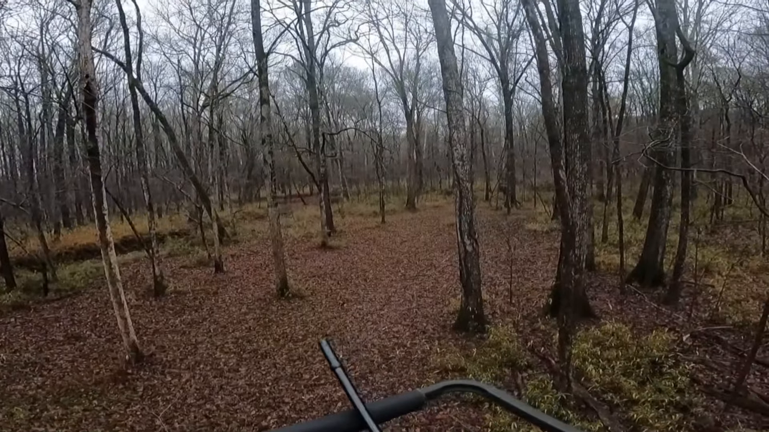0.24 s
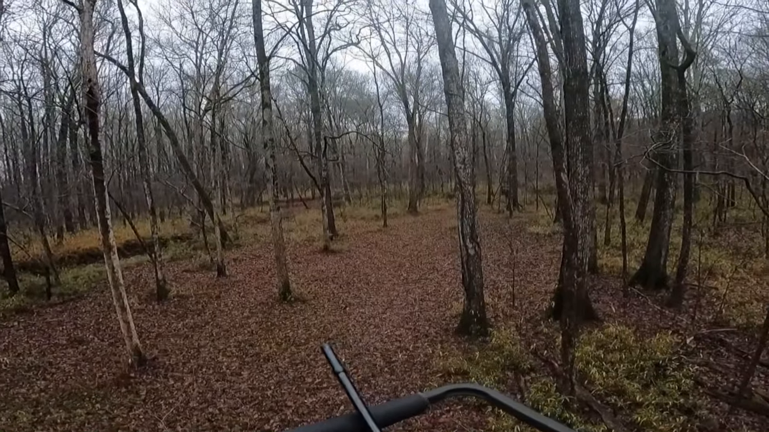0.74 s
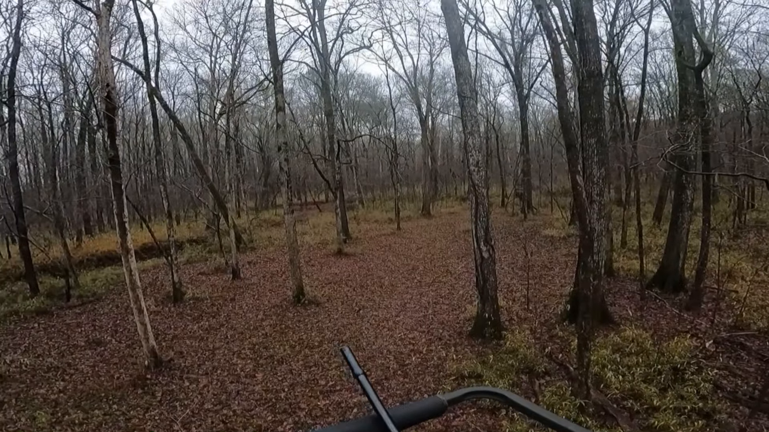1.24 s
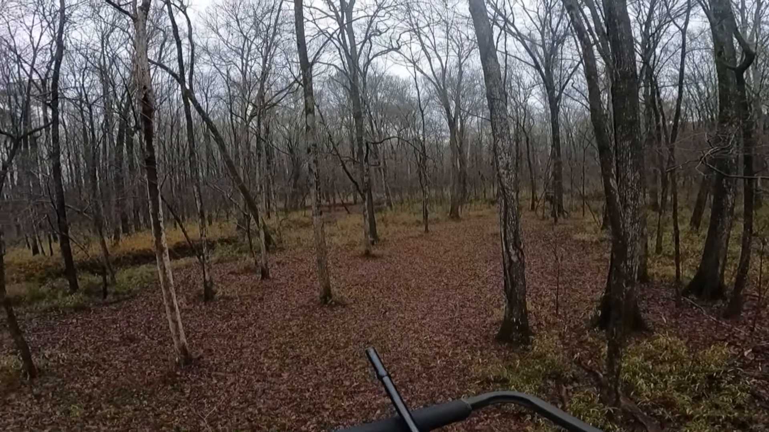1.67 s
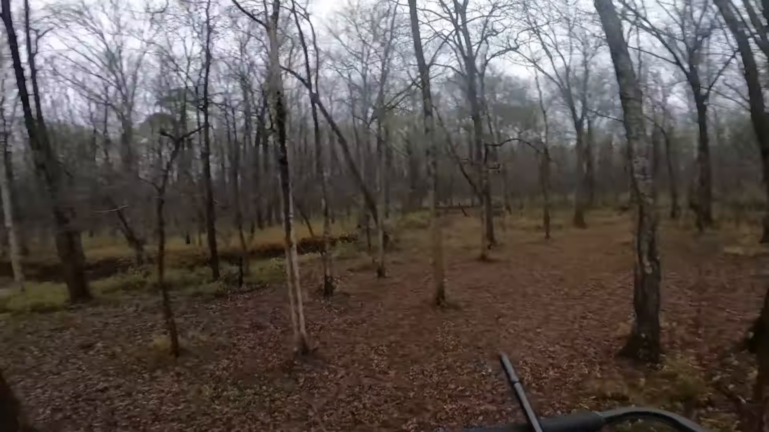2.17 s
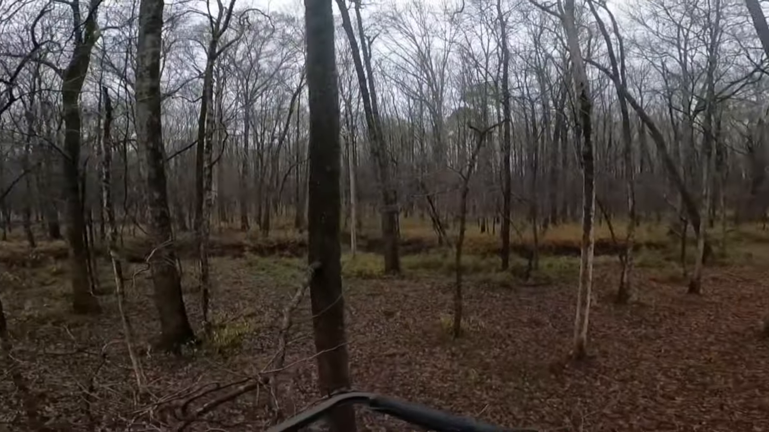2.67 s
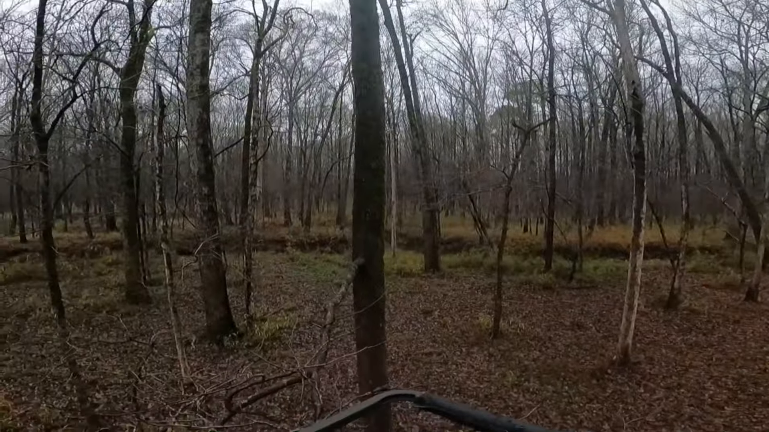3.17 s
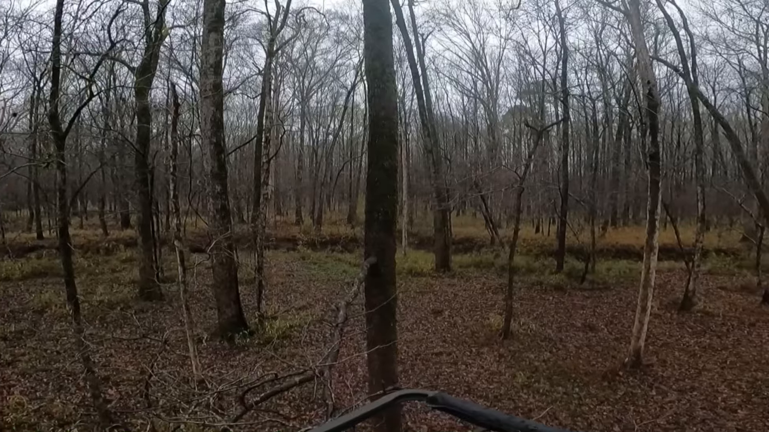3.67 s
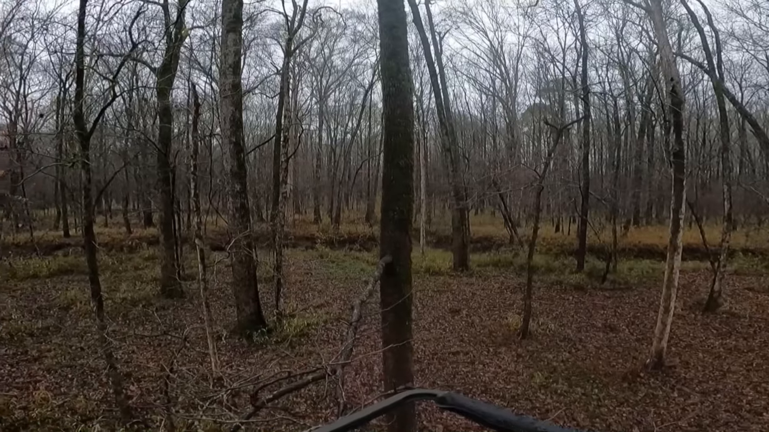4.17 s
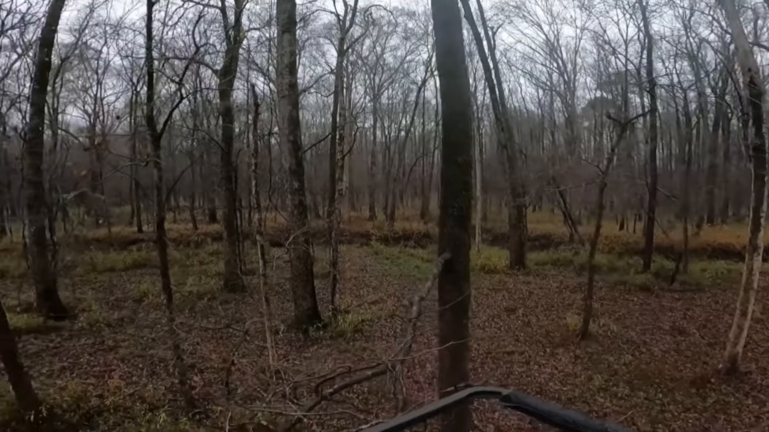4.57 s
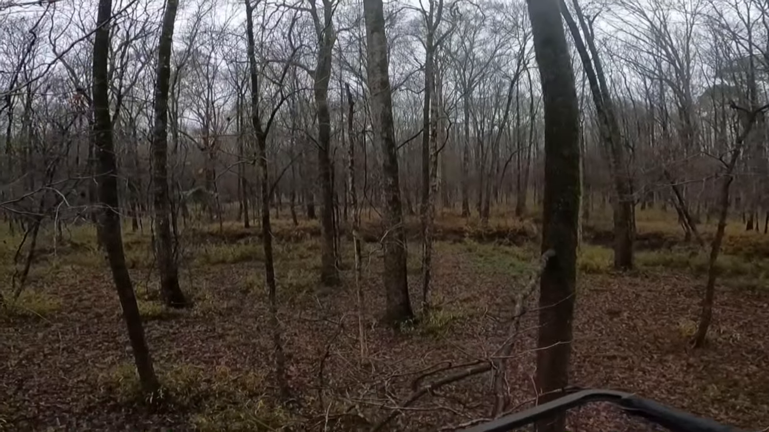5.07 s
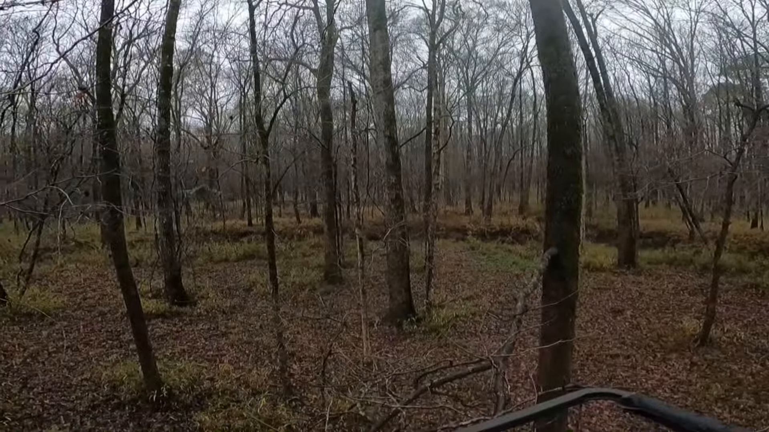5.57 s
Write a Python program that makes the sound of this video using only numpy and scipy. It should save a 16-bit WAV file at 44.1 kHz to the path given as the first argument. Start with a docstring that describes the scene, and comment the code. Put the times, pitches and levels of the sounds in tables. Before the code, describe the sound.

Close antler rattling in a bare winter wood, captured by a small camera microphone. It begins at once with a dense, uneven clatter of dry, bony clacks and gritty scraping until about 0.5 s, the loudest blows slightly overloaded. A diffuse echo from the trunks fades through a pause. A quick cluster hits at 1.85 s, then light ticks and a short clash around 2.2 s, a busier rattle from 2.4 to 2.6 s, and a compact burst at 2.9 s. During the next pause, faint high bird chirps rise between 3.2 and 3.95 s, with soft low wind swelling near 3.4 s. More short clacks and rubs come at 4.1, 4.4, 5.0 and 5.35 to 5.57 s. The echo stops abruptly near 5.6 s, leaving slightly brighter hiss, a very faint hoarse tone and two barely audible ticks. The antlers sit slightly left.

```python
"""Antlers clashing in a winter wood

A pair of antlers is knocked and ground together close to an action camera in a bare winter wood.
Each knock is a rough contact that rings the hand-damped tines for a few ms; loud peaks overload the microphone.
Grinding is made of dense noise ticks, and the trunks answer with a long echo of fading noise.
Behind lie a quiet filtered-noise hiss, low gusts of wind, faint rising bird chirps and a hoarse tone."""
import sys
import numpy as np
from scipy import signal
from scipy.io import wavfile
from scipy.ndimage import uniform_filter1d

SR = 44100
rng = np.random.default_rng(int(sys.argv[2]) if len(sys.argv) > 2 else 0)


def persist_wave(psi):
    """Save psi, clipped to +-1, as 16-bit WAV."""
    counts = np.round(np.clip(psi, -1, 1) * 32767).astype(np.int16)
    wavfile.write(sys.argv[1], SR, np.atleast_2d(counts).T)


N = 257103
TIME = np.arange(N) / SR  # seconds

# hiss of the wood: [f/Hz, relative level per Hz/dB]
WOOD_SPECTRUM = [(300, 2.5), (600, -4.5), (850, -5.5), (1100, -5.5), (1600, -6), (2350, -4.5), (3000, -5),
                 (3900, -6.5), (4500, -16.5), (5200, -22.5), (6300, -24), (7600, -15.5), (8300, -16),
                 (10000, -39.5), (12500, -60.5)]
# colour of the wind: [f/Hz, relative level/dB]
WIND_BANDS = [(26, -1.5), (60, -3), (110, -12), (170, 2), (260, -9.5)]
# strength of the wind over time: [t/s, level of deep buffeting/dB, level of rumble/dB]
GUST_LEVELS = [(0.0, -63, -54.5), (0.4, -66, -56), (0.6, -71.5, -70), (1.1, -72, -63), (1.6, -62, -56.5),
               (2.1, -68, -61), (2.8, -64, -61.5), (3.4, -52, -58.5), (3.9, -60, -57.5), (4.6, -67.5, -64),
               (5.2, -66, -65), (5.83, -69, -58.5)]
# rising chirps of a distant bird: [t/s, length/s, level/dB]
BIRD_CHIRPS = [(1.501, 0.031, -71.5), (3.239, 0.038, -53.5), (3.47, 0.013, -50), (3.521, 0.016, -56),
               (3.582, 0.032, -51.5), (3.852, 0.022, -56.5), (3.912, 0.04, -53.5)]
# echo of the trunks: [f/Hz, time to fall 60 dB/s, relative level/dB]
TRUNK_BANDS = [(663, 0.12, -37.5), (1320, 0.38, -35), (2880, 0.96, -40.5), (4370, 1.9, -45),
               (6500, 1.3, -40), (9300, 0.3, -28), (11000, .45, -39.5)]
# what the antlers ring with: [f/Hz, relative level/dB, time to fall 60 dB/ms]
ANTLER_MODES = [(1028, -17, 17), (1562, -17.5, 10), (1777, -9, 20), (2225, -6, 22), (2610, -6.5, 37),
                (2790, -3, 25), (3007, 11, 12), (3460, 6.5, 16), (3693, 2.5, 17), (4147, 4.5, 14),
                (4580, 0, 7.2), (4875, 0.5, 16), (5467, -4.5, 24), (6306, -5.5, 9.5), (6090, -11.5, 29),
                (7227, -10.5, 14), (7630, -21, 6), (8950, -18.5, 8.9), (10600, -14.5, 2.2)]
# tines grinding along each other: [start t/s, stop t/s, level/dB]
GRIND_SPELLS = [(0., 0.011, -31), (0.04, 0.108, -38.5), (0.133, 0.169, -19.5), (0.164, 0.216, -37),
                (0.276, 0.297, -23), (0.286, 0.323, -35), (0.354, 0.429, -33), (1.837, 1.863, -26.5),
                (2.184, 2.24, -38), (2.233, 2.284, -35), (2.452, 2.496, -23), (2.54, 2.6, -39.5),
                (2.901, 2.963, -35), (4.055, 4.099, -36), (4.428, 4.454, -27), (4.965, 5.053, -34),
                (5.045, 5.075, -33.5), (5.345, 5.376, -24.5), (5.47, 5.49, -41), (5.476, 5.53, -32.5)]
# knocks: [t/s, peak level before filtering/dB, loudest ring f/Hz, brightness/dB per octave]
KNOCK_LIST = [(0.0094, -10, 2560, -0.5), (0.0164, -6, 3500, 15.5), (0.0204, 4, 3620, 17),
              (0.035, -23.5, 2400, -13.5), (0.0463, -19, 2070, -17.5), (0.0608, -8, 3900, 12.5),
              (0.0708, -10, 3070, 17), (0.1198, -18, 2150, -4), (0.1294, -5, 5200, 10),
              (0.1483, -11, 3570, 16), (0.152, 0, 3230, 7.5), (0.1762, -8, 1640, -22),
              (0.1855, -4.5, 3330, -20), (0.2008, -13, 5100, -2.5), (0.229, -16.5, 3780, -16.5),
              (0.266, -14.5, 2000, -18.5), (0.271, -2.5, 2250, -11.5), (0.2852, 3.5, 3910, 18.5),
              (0.302, -20.5, 2180, -4.5), (0.327, -14, 4070, 14.5), (0.371, 2, 3290, 4.5),
              (0.3802, -1.5, 6220, 22.5), (0.3945, -2, 5270, 18), (0.4177, 1, 3614, 1),
              (0.4277, -4.5, 3880, -7), (0.4468, -17, 4100, -16), (0.457, -13, 3700, -27.5),
              (1.844, -9.5, 2270, -2.5), (1.8485, -8.5, 4940, 0), (1.8622, 6.5, 4530, 12.5),
              (1.8686, -10, 2200, -12.5), (1.8872, -5, 2410, 7), (1.892, -1, 5000, 22),
              (1.9034, -6, 5370, 22.5), (1.9188, -12, 2980, -3.5), (1.9226, -16, 3570, -9.5),
              (2.0282, -31, 2110, -15.5), (2.1013, -23, 1650, -18.5), (2.1842, -20.5, 2650, -7),
              (2.2013, -7, 2290, -3), (2.2516, 0, 2680, -2.0), (2.2549, -0.5, 3630, 2),
              (2.2586, -6, 3930, 11), (2.407, -6.5, 3630, 3), (2.412, -11.5, 2900, -17),
              (2.4232, -4.5, 4420, -11), (2.4273, 2, 4010, 4), (2.4393, -4, 2070, 4),
              (2.455, -1.5, 3360, 13), (2.4598, 2.5, 3370, 11.5), (2.472, -21, 3780, 15),
              (2.4856, -23, 2880, -9.5), (2.51, -10, 4260, 0.5), (2.5272, -16, 2630, -1.5),
              (2.5472, -18.5, 3200, 6), (2.5576, -2, 2790, -20), (2.5651, 0, 3730, -39.5),
              (2.5789, -10.5, 2715, -25), (2.5954, -3, 5203, 9), (2.8973, -20, 2090, -4),
              (2.9253, 2.5, 2900, 0.5), (2.9328, -3, 3530, 11), (2.9492, -4.5, 3770, -14),
              (2.9562, -5, 3520, 3), (3.022, -23.5, 1570, -26.5), (3.754, -36, 2744, -12.5),
              (3.664, -49, 2305, -14.5), (3.948, -38.5, 2700, -4), (4.041, -41, 2890, 6),
              (4.0577, -29, 2860, -14), (4.0793, -13, 3140, -14), (4.0959, 2.5, 3860, 6),
              (4.108, -6, 3440, -10.5), (4.133, -10, 2820, -14.5), (4.1389, -2.5, 6590, 5),
              (4.151, -13.5, 2940, -24), (4.173, -28, 1190, -15), (4.244, -30.5, 1450, -15),
              (4.4085, -15, 1520, -21), (4.4283, -8.5, 3200, -32.5), (4.437, -11, 2840, -13.5),
              (4.4472, 6.5, 2792, 14.5), (4.459, -14, 2750, 3.5), (4.4688, -10, 3970, 9),
              (4.4799, -1.5, 3020, 15.5), (4.4833, -9.5, 3000, 14.5), (4.4906, -10.5, 2896, 8.5),
              (4.9528, -11, 3250, -19), (5.019, 1.5, 3910, 3), (5.0265, -9.5, 2666, -10),
              (5.0334, -8, 5130, -3), (5.329, -32, 1310, -33), (5.3525, -7.5, 5130, -8),
              (5.3692, 2, 3050, -2), (5.396, -4.5, 2070, 19), (5.4, 2.5, 3480, 8.5),
              (5.4137, -12.5, 3840, 2), (5.485, -17, 2520, -13), (5.5128, -12, 1836, -50),
              (5.5301, 2.5, 3205, 10.5), (5.5382, -3.5, 2716, -22), (5.543, -8, 2960, 18),
              (5.5682, 1.5, 2970, 8), (5.783, -38.5, 2750, -21), (5.824, -37.5, 2540, -17)]
# the camera turns: [t/s, left minus right level/dB]
CAMERA_PAN = [(0.0, 4), (2.0, 3.5), (3.0, 2), (5.83, 2)]

WOOD_DB = -57
LATE_DB, LATE_TILT_DB = 4, 1.5  # late rise of the hiss: at 3 kHz, and more per octave above
CHIRP_HZ, CHIRP_RISE_HZ_PER_S = 2540, 30000
DRONE_HZ, DRONE_S, DRONE_RISE_S, DRONE_DB = 1420, 5.63, 0.032, -63.5  # a faint hoarse tone at the end
NEAR_T60_S, NEAR_DB, ECHO_RISE_S = 0.053, 7, 0.011  # near echo; build-up of the far one
ECHO_STOP_S = 5.61  # the echo breaks off here; the hiss is louder and brighter just after
GRIND_HZ, GRIND_HZ_PER_DB, GRIND_OCTAVES = 3340, 79.5, 1.2  # centre at -20 dB; lighter pressure is duller
MODE_SCATTER_DB, DETUNE = 3.5, .03  # random spread of mode levels, and of pitches as a fraction
LEAD_OVER_DB = 4  # how far the loudest mode stands out in a 0 dB knock
CONTACT_RISE_MS = 0.61
FADE_MS, FADE_MS_PER_DB = 12, -0.15  # time for the contact to fall 60 dB; softer ones linger
CRACK_DB = -3.5  # relative to the loudest mode
HARD_HZ, SOFTEN = 9900, 0.11  # treble limit of a 0 dB knock; how strongly it follows the level
THUD_HZ, THUD_DB = 247, -26.5
SHUDDER_HZ, SHUDDER_DB = 28, -15
MIC_LOW_HZ, MIC_LOW_DB, MIC_HIGH_HZ, MIC_HIGH_DB = 1061, -8, 7890, -10
TOP_HZ = 16500


def undb(db):
    """Turn decibels into a plain multiplier."""
    return 10 ** (np.asarray(db) / 20)


def level(x, db):
    """Scale a sound to a given average (RMS) level."""
    return x * undb(db) / np.sqrt(np.mean(x ** 2))


def band(x, hz, width):
    """Keep only a band around hz, with its width in octaves."""
    edges = hz * 2. ** (np.array([-width, width]) / 2)
    return signal.sosfilt(signal.butter(2, edges, "band", fs=SR, output="sos"), x)


def walk(rate):
    """Random levels, each held 1 / rate seconds, then smoothed twice; spread near 1."""
    hold = int(SR / rate)
    steps = np.repeat(rng.standard_normal(N // hold + 1), hold)
    return 1.3 * uniform_filter1d(uniform_filter1d(steps, hold), hold)[:N]


def pair(alike, size):
    """Left and right noise with the given correlation."""
    mid, side = rng.standard_normal((2, size))
    alike = np.clip(alike, 0, 1)
    opposite = side * np.array([[1], [-1]])
    return np.sqrt((1 + alike) / 2) * mid + np.sqrt((1 - alike) / 2) * opposite


def wood():
    """Distant hiss of twigs and leaves: noise in third-octave bands that flicker a little."""
    f, db = np.transpose(WOOD_SPECTRUM)
    hiss, swell = 0, walk(2.6)
    late = TIME > ECHO_STOP_S + .015
    for hz in 300 * 2 ** np.arange(0, 5.4, 1 / 3):
        gain_db = np.interp(np.log(hz), np.log(f), db) + 0.43 * swell + 1.4 * walk(9.6)
        gain_db += late * (LATE_DB + LATE_TILT_DB * np.log2(hz / 3000))
        hiss = hiss + undb(gain_db) * band(pair(0.2, N), hz, 1 / 3)
    return level(hiss, WOOD_DB)


def wind():
    """Low gusts on the microphone ports: noise bands that each buffet on their own."""
    s, deep_db, rumble_db = np.transpose(GUST_LEVELS)
    gusts = 0
    for hz, db in WIND_BANDS:
        gust_db = np.interp(TIME, s, deep_db if hz < 100 else rumble_db) + 3.5 * walk(7)
        noise = band(pair(0.87, N), hz, .7)
        gusts = gusts + level(noise, db) * undb(gust_db)
    return gusts


def birds():
    """Short sine chirps that rise in pitch, and a hoarse tone made of narrow-band noise."""
    chirps = np.zeros(N)
    for s, length, db in BIRD_CHIRPS:
        t = np.clip(TIME - s, 0, length)
        swell = np.sin(np.pi * t / length)
        cycles = CHIRP_HZ * t + CHIRP_RISE_HZ_PER_S * t * t / 2
        chirps += undb(db) * swell * np.sin(2 * np.pi * cycles)
    drone = level(band(rng.standard_normal(N), DRONE_HZ, 0.081), DRONE_DB)
    return chirps + drone * np.clip((TIME - DRONE_S) / DRONE_RISE_S, 0, 1)


def trunks(x, size=70000):
    """Scatter from many trunks: a quick noise tail from near trees and ground, a slow one from far."""
    t = np.arange(size) / SR
    tail = 0
    for hz, t60, db in TRUNK_BANDS:
        far = (1 - np.exp(-t / ECHO_RISE_S)) * undb(-60 * t / t60)
        near = undb(NEAR_DB - 60 * t / NEAR_T60_S)
        noise = band(pair(0.97, size), hz, min(1.1, 5000 / hz)) / np.sqrt(hz / 30)
        tail = tail + undb(db) * (far + near) * noise
    echo = signal.fftconvolve(x[None], tail)[:, :N]
    return echo * np.clip((ECHO_STOP_S - TIME) / .002, 0, 1)


def grinding():
    """Dense stick-slip ticks, in uneven spurts, heard through the antler modes near a centre pitch."""
    ticks = rng.standard_normal(N) * undb(5 * rng.standard_normal(N) + 4 * walk(220))
    body = 0
    for hz, db, t60_ms in ANTLER_MODES:
        # a mode that rings longer passes a narrower band
        body = body + undb(0.09 * db) * band(ticks, hz, 5000 / t60_ms / hz)
    grind = np.zeros(N)
    for start, stop, db in GRIND_SPELLS:
        i, j = int(start * SR), int(stop * SR)
        centre_hz = GRIND_HZ + GRIND_HZ_PER_DB * (db + 20)
        rub = band(body[i:j], centre_hz, GRIND_OCTAVES) * np.hanning(j - i) ** 0.88
        grind[i:j] += level(rub, db)
    return grind


def knock(peak_db, lead_hz, tilt_db, count):
    """A rough, chattering contact rings all modes, one of them most; returns port, wood and thud sounds."""
    hz, db, t60_ms = np.transpose(ANTLER_MODES)
    ms = np.arange(count) / SR * 1000
    decay = undb(-60 * ms / t60_ms[:, None])
    chance, grit = rng.standard_normal((4, len(hz))), rng.standard_normal((2, count))
    f = hz * (1 + DETUNE * chance[0])  # the grip and the touching tines shift the modes
    mean_db = db + tilt_db * np.log2(np.maximum(hz, 1300) / 3200)
    mode_db = mean_db + MODE_SCATTER_DB * chance[1]
    lead = np.argmin(abs(np.log(hz / lead_hz)))
    f[lead] = lead_hz
    mode_db[lead] = mode_db.max() + LEAD_OVER_DB + 0.11 * peak_db  # hard blows ring clearest

    # the two ports hear each mode a little differently
    port_db, port_rad = 1.2 * chance[2], .2 * chance[3]
    angle = 2 * np.pi * f[:, None] * ms / 1000
    ports = []
    for side in (1, -1):
        gain = undb(mode_db + side * port_db)[:, None]
        ports.append((gain * decay * np.sin(angle + side * port_rad[:, None])).sum(0))
    ring = np.array(ports)
    ring[:, :2] += undb(mode_db.max() + CRACK_DB) * np.array([1, -1])  # dry snap of the contact

    # bone skids on bone: uneven micro-blows that build up fast and die away
    fade_ms = FADE_MS + FADE_MS_PER_DB * peak_db
    force = (1 - np.exp(-(ms / CONTACT_RISE_MS) ** 2)) * undb(-60 * ms / max(fade_ms, 3))
    blows = force * grit[0] * undb(3.66 * grit[1])
    # a softer blow is a longer touch and loses the treble
    touch_hz = np.clip(HARD_HZ * undb(SOFTEN * peak_db), 2000, 18000)
    touch = signal.butter(3, touch_hz, fs=SR, output="sos")
    ring = signal.fftconvolve(ring, signal.sosfilt(touch, blows)[None])
    middle = ring.mean(0)
    scale = undb(peak_db) / abs(middle).max()

    # the wood gets the sound of all directions at once, where single modes stand out less
    blur_gain = undb(.6 * mode_db + .4 * mean_db)[:, None]
    blur = signal.sosfilt(touch, (blur_gain * decay ** 2 * np.sin(angle)).sum(0))
    around = blur * scale * np.linalg.norm(middle) / np.linalg.norm(blur)
    thud = undb(peak_db) * np.sign(grit[0, 0]) * np.sin(np.pi * np.minimum(ms / 1.3, 1))
    return ring * scale, around, thud


def antlers(count=1200):
    """Knocks ring, thud in the hands and mix with grinding; returns port sound and sound sent to the wood."""
    clack, (around, thud) = np.zeros((2, N + 2 * count)), np.zeros((2, N + count))
    for s, peak_db, lead_hz, tilt_db in KNOCK_LIST:
        ring, spread, push = knock(peak_db, lead_hz, tilt_db, count)
        i = int(s * SR)
        clack[:, i:i + ring.shape[1]] += ring
        around[i:i + count] += spread
        thud[i:i + count] += push
    # hard blows shake the body that carries the microphone
    shudder = undb(SHUDDER_DB) * band(abs(thud[:N]), SHUDDER_HZ, 0.75)
    low_thud = undb(THUD_DB) * band(thud[:N], THUD_HZ, 5)
    grind = grinding()
    # thin tines radiate their lowest modes poorly
    clack = signal.sosfilt(signal.butter(1, 1600, "high", fs=SR, output="sos"), clack)
    return clack[:, :N] + grind + low_thud + shudder, around[:N] + grind


def scene():
    """Antlers and their echo shift between left and right; hiss, wind and birds do not."""
    pan_db = np.interp(TIME, *np.transpose(CAMERA_PAN))
    near, around = antlers()
    front = near + trunks(around)
    return front * undb(np.array([pan_db, -pan_db]) / 2) + wood() + wind() + birds()


def record(dry):
    """The housing favours 1-8 kHz; peaks clip, then the extreme treble is cut."""
    x = dry
    for hz, db, kind in ((MIC_LOW_HZ, MIC_LOW_DB, "high"), (MIC_HIGH_HZ, MIC_HIGH_DB, "low")):
        inside = signal.sosfiltfilt(signal.butter(10, hz, kind, fs=SR, output="sos"), x)
        x = inside + undb(db) * (x - inside)
    clipped = np.clip(x, -1, 1)
    return signal.sosfilt(signal.butter(6, TOP_HZ, fs=SR, output="sos"), clipped)


dry = scene()
out = record(dry)
persist_wave(out)
```